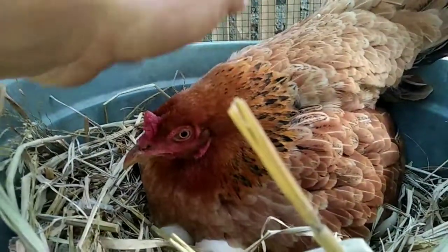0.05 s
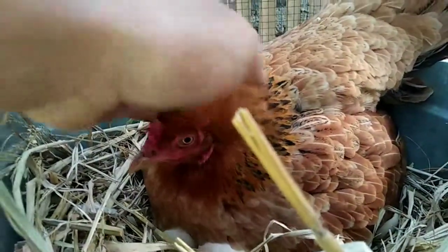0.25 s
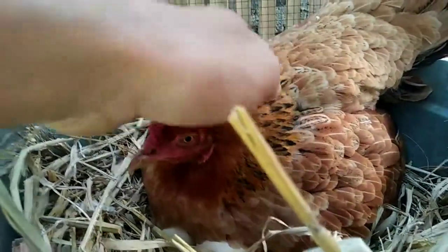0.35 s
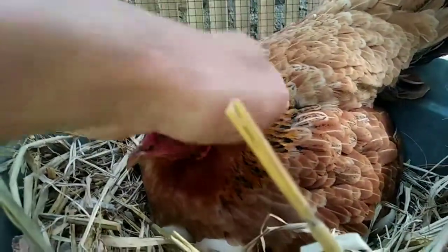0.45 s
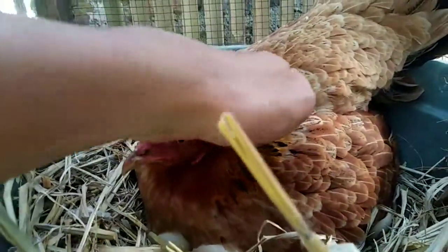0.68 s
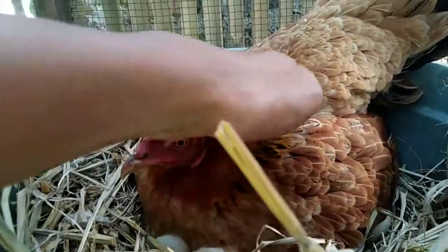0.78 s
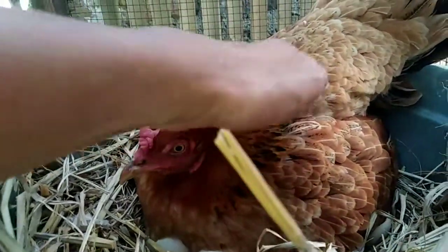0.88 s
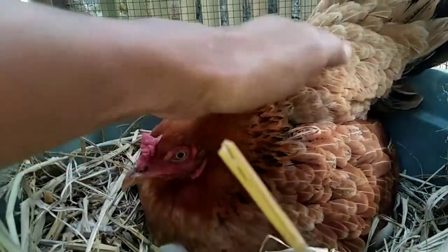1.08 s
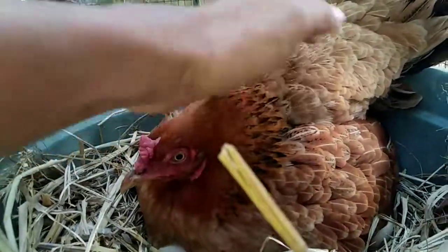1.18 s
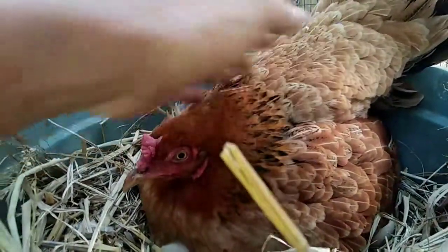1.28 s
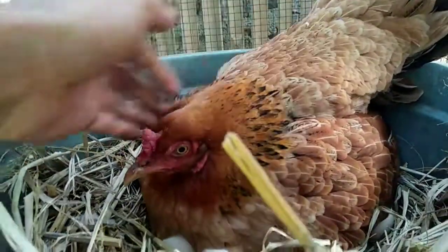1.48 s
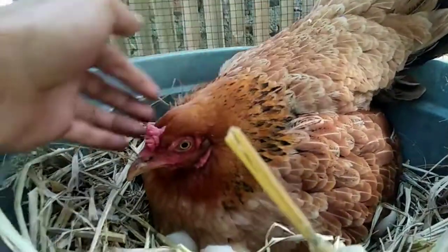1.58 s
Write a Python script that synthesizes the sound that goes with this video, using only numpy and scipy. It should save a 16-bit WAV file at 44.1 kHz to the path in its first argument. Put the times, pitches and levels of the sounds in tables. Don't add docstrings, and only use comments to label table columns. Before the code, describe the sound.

A broody hen growls once, close by, in a straw nest. Faint yard air and low handling rumble come first; at about 0.4 s her call starts unsteadily, swells by 0.5 s into a harsh, nasal, rapidly fluttering growl with breathy hiss, then breaks at 0.9 s into weak bursts ending near 1.0 s. Soft straw rubs and dull microphone bumps follow until about 1.6 s.

```python
import sys
import numpy as np
from scipy import signal
from scipy.fft import rfft, irfft
from scipy.io import wavfile
from scipy.ndimage import uniform_filter1d

SR = 44100
rng = np.random.default_rng(int(sys.argv[2]) if len(sys.argv) > 2 else 0)


def master(y):
    cut = np.clip(np.atleast_2d(y).T, -1, 1)
    pcm = np.round(cut * 32767)
    wavfile.write(sys.argv[1], SR, pcm.astype(np.int16))


def gain_from_db(level_db):
    decades = np.asarray(level_db, float) / 20
    return 10 ** decades


N = 72765


def evened(x):
    return x / np.sqrt(np.mean(x ** 2) + 1e-20)


def read(points, hz):
    f, value = np.transpose(points)
    return np.interp(np.log(hz + 1), np.log(f + 1), value)


def resonate(x, hz, width):
    turn = np.exp(2j * np.pi * hz * np.arange(x.shape[-1]) / SR)
    r = np.exp(-np.pi * width / SR)
    return 2 * (turn * signal.lfilter([1 - r], [1, -r], x / turn)).real


def wander(size, shape=N):
    once = uniform_filter1d(rng.standard_normal(shape), size)
    return evened(uniform_filter1d(once, size))


# (t/s, count/beats)
FLUTTER_BEATS = [(.417, -4), (.484, 0), (.61, 7), (.646, 9), (.666, 10), (.737, 14), (.79, 17), (.826, 19),
                 (.885, 22), (1.001, 28), (1.06, 31)]


def flutter(t, hz):
    angle = 2 * np.pi * np.interp(t, *np.transpose(FLUTTER_BEATS))
    beat = np.cos(angle)
    bend = 0.07 * beat + 0.04 * np.cos(2 * angle + 0.86)
    turns = np.cumsum(hz * (1 + bend + .025 * wander(size=100))) / SR
    return turns, beat


# (first pulse t/s, f/Hz, length/cycles)
LAST_BURSTS = [
    (.900, 250, 2),
    (.918, 236, 2),
    (.9375, 250, 2),
    (.960, 226, 1.5),
    (.980, 245, 1),
    (.994, 268, 2),
]


def bursts(t):
    open_s, close_s = .0022, .004
    start, hz, cycles = np.transpose(LAST_BURSTS)
    end = start + cycles / hz
    gaps = (start[1:] - end[:-1]) * hz[1:]
    done = np.cumsum(np.r_[0, np.round(cycles[:-1] + gaps)])
    knots = np.r_[start[0] - .1, np.c_[start, end].ravel(), end[-1] + .1]
    turns = np.r_[-.1 * hz[0], np.c_[done, done + cycles].ravel(), done[-1] + cycles[-1] + .1 * hz[-1]]
    early = np.maximum(start[:, None] - t, 0) / open_s
    late = np.maximum(t - end[:, None], 0) / close_s
    opening = np.exp(-early ** 2 - late ** 2).max(0)
    return np.interp(t, knots, turns), 2 * opening - 1


def folds(shaky, gate, beat, rough, shut):
    partials = sum(np.sin(2 * np.pi * k * shaky) for k in range(2, 10))
    partials = partials * (1 + 0.16 * wander(size=100))
    air = (.3 + gate) * rng.standard_normal(N)
    drive = (1 - rough) * evened(partials) + 0.45 * rough * evened(air)
    return drive * (1 - shut + 1.65 * shut * ((1 + beat) / 2) ** 1.2)


# (f/Hz, level/dB)
THROAT_COLOUR = [(330, 20.5), (450, 5), (650, 4), (850, 6.5), (1250, 0.5), (1600, -11.5), (2250, -33),
                 (2800, -59)]


def throat(drive, effort_db, rough, on):
    f = np.fft.rfftfreq(N, 1 / SR)
    colour = rfft(drive) * gain_from_db(read([(200, -51)] + THROAT_COLOUR, f))
    low = irfft(colour / (1 + (f / 1600) ** 8), N)
    high = irfft(colour / (1 + (1600 / (f + 1)) ** 8), N)
    ring_hz, ring_width_hz = 818, 100
    ring = resonate(resonate(drive, ring_hz, ring_width_hz), ring_hz, 2 * ring_width_hz)
    ring = ring / np.std(ring[on > .5]) * gain_from_db(-18.5 + 2.0 * rough)
    bright = gain_from_db(1.2 * (effort_db + 30.0))
    return (low + high * bright) / np.std(low[on > .5]) + ring


# (f/Hz, level/dB)
OTHER_TONES = [(805, -14), (1095, -16)]


def second_voice(beat, shut):
    other = np.zeros(N)
    for hz, db in OTHER_TONES:
        shake = gain_from_db(db + 3 * wander(size=200))
        turns = np.cumsum(hz * (1 + 0.022 * wander(size=300))) / SR
        other += shake * np.sin(2 * np.pi * turns)
    return 1.5 * other * (1 - shut * beat) * (1 - shut)


def breathy(puffs, hz, width, on):
    band = resonate(resonate(resonate(puffs, hz, width), hz, width), hz, 2 * width)
    return band / np.std(band[:, on > .5])


# (f/Hz, width/Hz, level/dB, share of beak opening, drift/dB per s)
HISS_BANDS = [(2206, 266, -26.5, .4, -6.5), (3300, 820, -47, 1.7, 10.5), (4040, 370, -45, 1.5, 22.5),
              (5760, 880, -37.5, 0.69, -11.5), (6990, 980, -42, 0.26, 5.5), (8580, 670, -52.5, 0.53, 7.5)]
# (t/s, level/dB)
BEAK_OPENING = [(.4, -8), (.5, -0.5), (.525, -15), (.57, -15), (.582, 4), (.7, 1.5), (.78, -1.5),
                (.885, 1.5), (.9, -4.5)]


def beak_hiss(t, gate, beat, depth, on):
    puffs = (0.21 + gate) * (1 + depth ** 0.6 * beat) * rng.standard_normal((2, N))
    puffs = evened(puffs + 0.35 * puffs[0])
    beak_db = np.interp(t, *np.transpose(BEAK_OPENING))
    hiss = np.zeros((2, N))
    for hz, width, db, share, drift_db in HISS_BANDS:
        level = gain_from_db(db + share * beak_db + drift_db * (t - 0.71))
        hiss += level * breathy(puffs, hz, width, on)
    return hiss


def voice(rows, broken=False):
    t = np.arange(N) / SR
    times, *columns = np.transpose(rows)
    hz, effort_db, depth, first_db, rough = (np.interp(t, times, c) for c in columns)
    depth, rough = np.clip(depth, 0, 1), np.clip(rough, 0, 1)
    fade_out = np.exp(-(np.maximum(t - times[-1], 0) / .004) ** 2)
    on = np.clip((t - times[0]) * 250, 0, 1) * fade_out
    turns, beat = bursts(t) if broken else flutter(t, hz)
    shaky = turns + 0.1 * rough * wander(size=80)
    gate = np.exp(-(shaky % 1) / 0.44)
    shut = depth ** 1.23
    first = np.sqrt(2) * np.sin(2 * np.pi * turns) * gain_from_db(first_db)
    first = first * (1 + depth * beat) * (1 + 0.12 * wander(size=150))
    upper = throat(folds(shaky, gate, beat, rough, shut), effort_db, rough, on)
    upper = upper + second_voice(beat, shut)
    limit = 4.14
    body = limit * np.tanh((first + upper) / limit)
    hiss = beak_hiss(t, gate, beat, depth, on) * gain_from_db(0.1 * (effort_db + 28))
    return on * gain_from_db(effort_db) * (body + hiss)


# (t/s, f/Hz, effort level/dB, flutter depth 0-1, first partial level/dB, roughness 0-1)
CALL_START = [
    (.409, 283.7, -106, 1.05, 1, 0),
    (.414, 295.4, -46.5, 0.2, 13, 0.3),
    (.431, 285, -42.5, 0.95, -2, 0.3),
    (.442, 284.5, -57, 0.3, 15.5, 0.12),
    (.447, 733, -68, 0.6, 22.5, 1.1),
    (.458, 460, -40, 0.2, -11, 0.56),
    (.468, 609, -43.5, 0, 5, 0.2),
    (.48, 704, -35.5, 0, -12, 0.95),
]
CALL_GROWL = [(.477, 287.4, -35.5, 1, 1, 0.39), (.5, 290.5, -30, 0.7, 3.5, 0.2),
              (.515, 292.5, -26.5, .4, -23, 0.49), (.535, 288.4, -27.5, 0.35, -11, 0.55),
              (.555, 277, -25, 0.73, -15, 0.46), (.575, 295, -24, 0.75, -1.5, 0.63),
              (.635, 304, -26.5, 0.35, -1.5, .4), (.68, 296.4, -26, 0.1, 0, 0.56),
              (.72, 284, -30, 0.12, 4.5, 0.4), (.79, 300.1, -28.5, 0.32, 2.5, .3),
              (.87, 305, -26.5, 0.16, 0.5, 0.48), (.892, 286, -26, 0.54, -1.5, 0.49)]
CALL_TAIL = [
    (.897, 250, -32.5, .9, -1, .2),
    (.925, 235, -34.5, .93, -1, .25),
    (.942, 240, -33.5, .97, -2.5, .2),
    (.962, 230, -37.5, .97, -1.5, .25),
    (.982, 240, -38, .93, -2, .25),
    (1.004, 260, -33, .97, -2, .25),
]
# (f/Hz, left minus right level/dB)
EAR_COLOUR = [(60, -2.5), (300, -1), (850, -2.5), (1100, -3.5), (1350, 8.5), (2350, 1), (3800, -6),
              (5200, -4)]


def hen():
    t = np.arange(N) / SR - 1.021
    last = gain_from_db(-39) * np.exp(-(t / .013 * 2) ** 2) * np.sin(2 * np.pi * 255 * t)
    x = voice(CALL_START) + voice(CALL_GROWL) + voice(CALL_TAIL, broken=True) + last
    hz = np.fft.rfftfreq(N, 1 / SR)
    side = np.array([[.5], [-.5]])
    low_cut = 1 / np.sqrt(1 + (200 / (hz + 1)) ** 18)
    lag_s = .00016
    delay = np.exp(-2j * np.pi * hz * lag_s * side)
    x = irfft(rfft(x) * low_cut * gain_from_db(side * read(EAR_COLOUR, hz)) * delay, N)
    u, nest_t60_s = np.arange(8000) / SR, .13
    taps = rng.choice([-1., 1.], (2, 8000)) * (rng.random((2, 8000)) < .05)
    taps = taps * gain_from_db(-60 * u / nest_t60_s) * (u > .002)
    taps = taps / np.linalg.norm(taps[0])
    ring = signal.fftconvolve(np.diff(x, prepend=0) * 8, taps, axes=1)[:, :N]
    return x + gain_from_db(-16) * ring


# (start t/s, length/s, level/dB, f/Hz)
HAND_TREMORS = [
    (0.174, 0.13, -38, 85.7),
    (0.754, 0.089, -35, 86.6),
    (0.854, 0.032, -37.5, 81.6),
    (0.947, 0.098, -44.5, 96),
    (1.01, 0.12, -42, 83.8),
    (1.252, 0.18, -58.5, 81),
    (1.421, 0.15, -59, 72),
]
# (t/s, level/dB, f/Hz)
HAND_BUMPS = [
    (0.063, -51, 54.4),
    (0.351, -41.5, 70),
    (0.428, -43, 57.3),
    (0.668, -37, 63.4),
    (1.214, -37, 92),
    (1.392, -37.5, 106),
    (1.518, -43.5, 88),
]


def handling():
    t, out = np.arange(N) / SR, np.zeros(N)
    for start, length, db, hz in HAND_TREMORS:
        u = t - start
        swell = np.sin(np.pi / 2 * np.clip(u / (0.47 * length), 0, 1))
        stop = np.clip((length - u) / .01, 0, 1)
        turn = 2 * np.pi * (hz * u + 0.062 * wander(size=500))
        tone = np.sqrt(2) * (np.sin(turn) + gain_from_db(-16.5) * np.cos(2 * turn))
        out += gain_from_db(db + 1.0 * wander(size=500)) * swell * stop * tone
    for start, db, hz in HAND_BUMPS:
        u = (t - start) * hz
        out -= 0.68 * gain_from_db(db) * np.sin(2 * np.pi * u) * np.exp(-(u / 0.55) ** 2)
    return out


# (t/s, level/dB, f/Hz, length/s)
STRAW_RUBS = [(0.125, -63, 2100, 0.098), (0.126, -60, 386, 0.09), (1.025, -46, 327, 0.088),
              (1.337, -58.5, 620, 0.23), (1.167, -64, 5700, 0.064), (1.174, -64.5, 3200, 0.031),
              (0.31, -56, 1200, .02), (0.421, -60.5, 1470, 0.13), (1.169, -48, 910, 0.019),
              (1.159, -64, 1760, .012), (1.303, -56, 1360, 0.015), (1.327, -63, 1920, 0.05),
              (1.372, -63, 1510, 0.024), (1.392, -67, 566, 0.013), (1.546, -50, 318, 0.037),
              (1.548, -58, 740, 0.12), (1.597, -59, 1540, 0.073)]


def straw():
    t, out = np.arange(N) / SR, np.zeros((2, N))
    for start, db, hz, length in STRAW_RUBS:
        noise = rng.standard_normal((2, N))
        width = 150 + 0.35 * hz
        rub = evened(resonate(resonate(noise + noise[0], hz, width), hz, width))
        out += .5 * gain_from_db(db) * np.exp(-((t - start) / length * 2) ** 2) * rub
    return out


# (f/Hz, level/dB per Hz)
YARD_COLOUR = [(12, -75), (20, -12.5), (109, -5), (156, 2.5), (194, -10), (590, -14), (1250, -18.5),
               (2360, -25), (15100, -32)]
# (f/Hz, likeness -1 to 1)
EAR_LIKENESS = [(60, 0.71), (180, 1), (540, 0.92), (1630, 0.081), (4890, 0.18), (14700, -0.11)]
# (f/Hz, level/dB, width/Hz, fade/dB per s)
FAR_HUMS = [(139.2, -63, 3.4, 1), (2390, -85, 5.5, -10), (73, -66.5, 31, 4)]


def yard():
    frames, hz = N // 256 + 5, np.fft.rfftfreq(1024, 1 / SR)
    a, b, c, d, patches = rng.standard_normal((frames, 513, 5)).T
    patches = uniform_filter1d(patches, size=14, axis=0)
    patches = evened(uniform_filter1d(patches, size=10, axis=1))
    bass_share = 1.0 / (1 + (hz / 200) ** 2) + 0.12
    lumps = wander(size=3, shape=frames) * bass_share[:, None]
    same = np.clip(read(EAR_LIKENESS, hz), -1, 1)[:, None]
    left = a + 1j * b
    right = same * left + np.sqrt(1 - same ** 2) * (c + 1j * d)
    spectrum = np.array([left, right]) * gain_from_db(read(YARD_COLOUR, hz)[:, None] + 1.7 * patches + lumps)
    floor = signal.istft(spectrum, nperseg=1024, noverlap=768)[1][:, :N]
    hums = np.zeros(N)
    for f, db, width, fade_db in FAR_HUMS:
        hum = evened(resonate(resonate(rng.standard_normal(N), f, width), f, width))
        hums += gain_from_db(db + fade_db * np.arange(N) / SR) * hum
    return gain_from_db(-61) * evened(floor) + hums


# (t/s, left minus right level/dB)
CAMERA_TURN = [(0, -1), (1.0, 0.5), (1.249, 0.5), (1.65, 1)]


def scene():
    lean_db = np.interp(np.arange(N) / SR, *np.transpose(CAMERA_TURN))
    pan = gain_from_db(lean_db * [[.5], [-.5]])
    around = straw() + handling() + yard()
    around = np.array([np.roll(around[0], 18), around[1]])
    return hen() + around * pan


def band_limit(x):
    return signal.sosfilt(signal.butter(12, 15290, fs=SR, output="sos"), x)


def record(dry):
    low_pass = signal.firwin(41, 14200, fs=SR)
    mix = signal.oaconvolve(dry, low_pass[None], "same")
    return band_limit(mix)


dry = scene()
out = record(dry)
master(out)
```